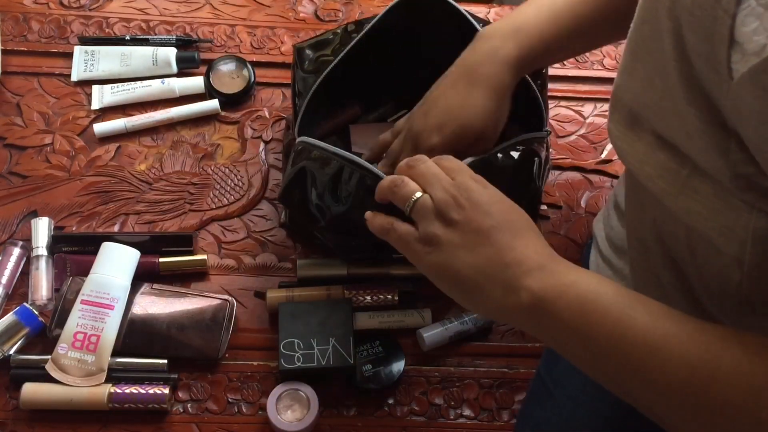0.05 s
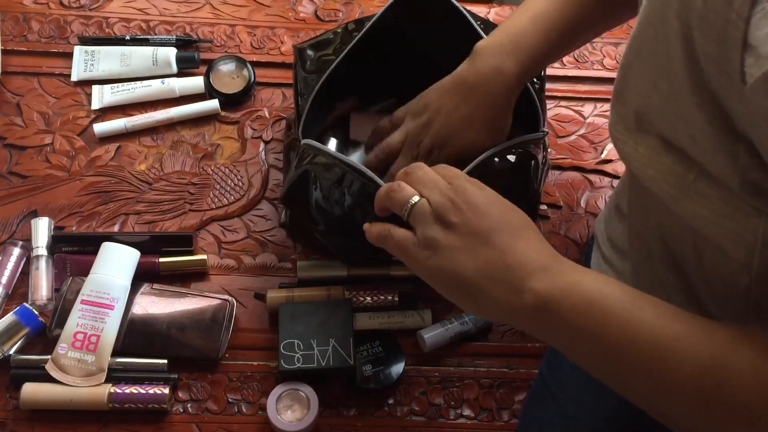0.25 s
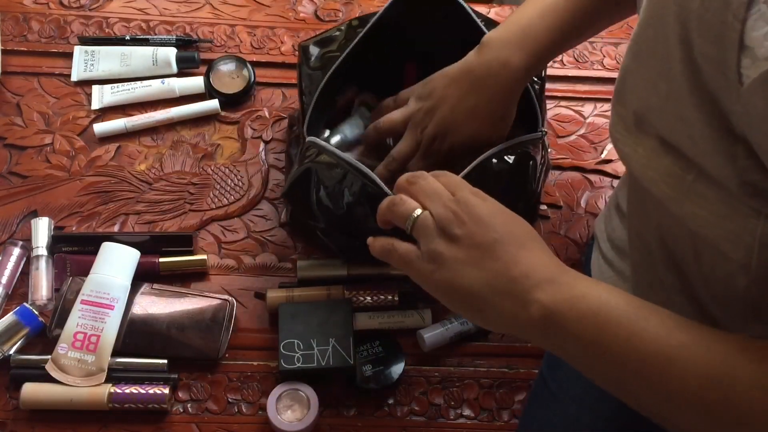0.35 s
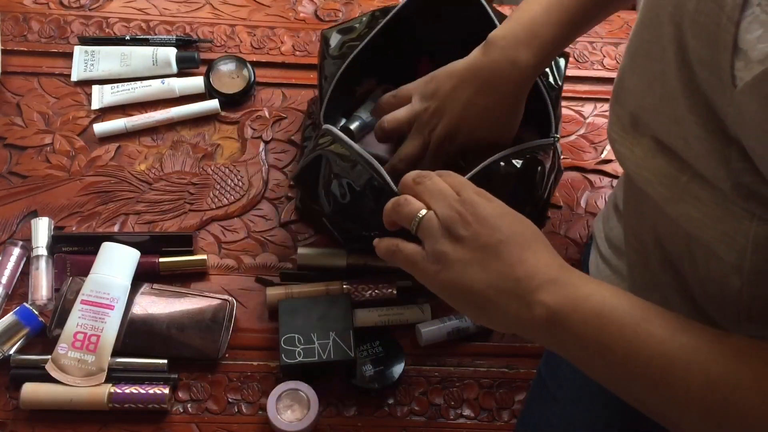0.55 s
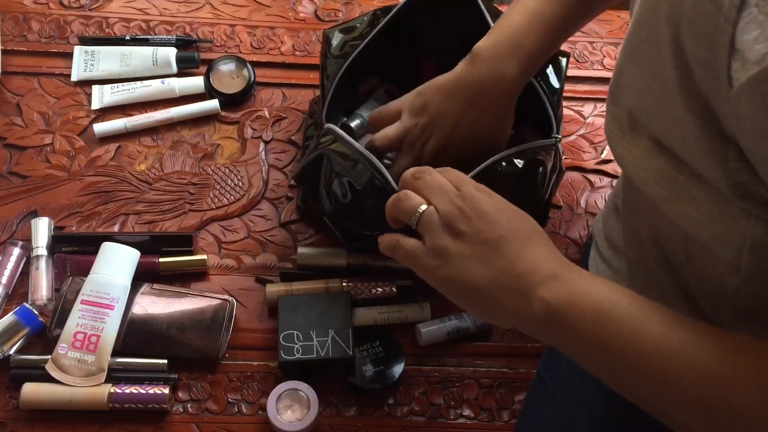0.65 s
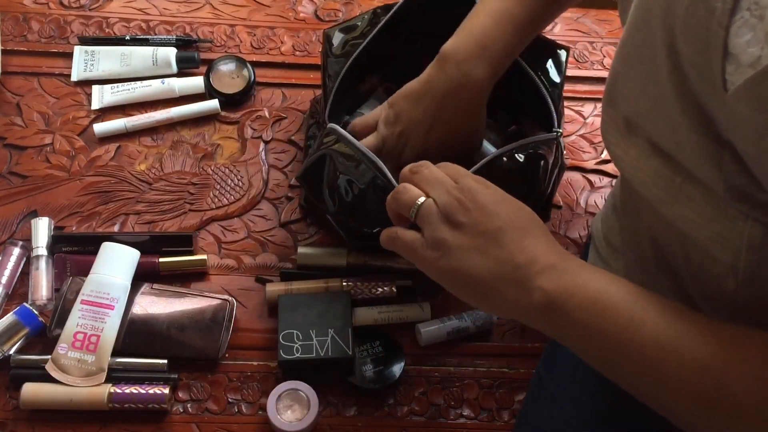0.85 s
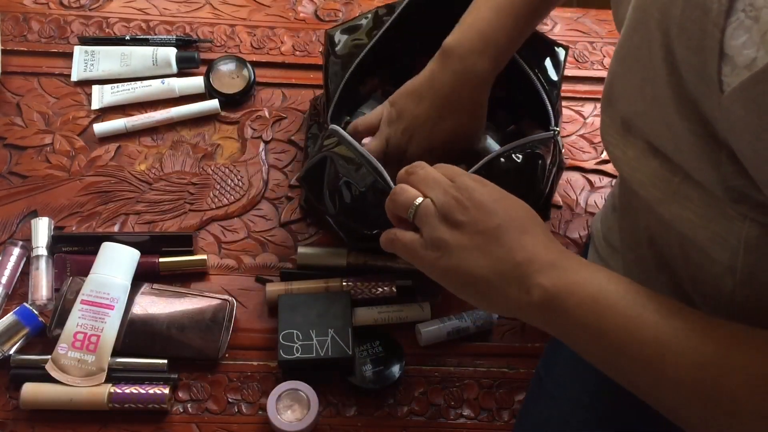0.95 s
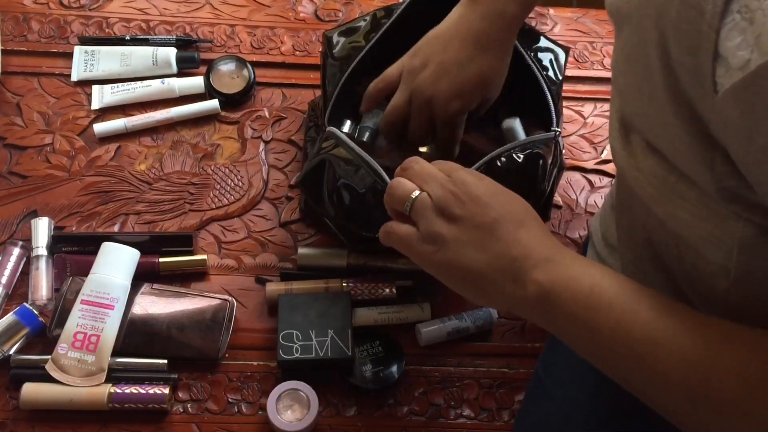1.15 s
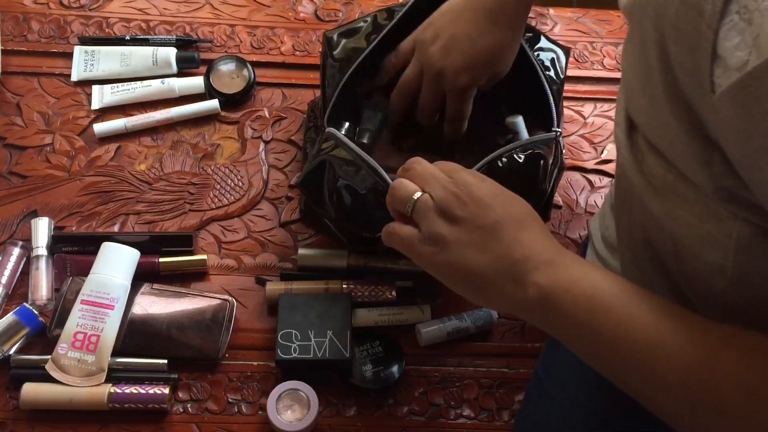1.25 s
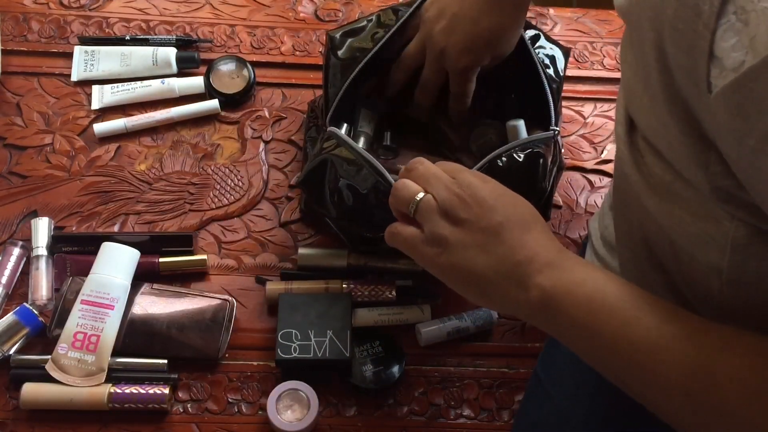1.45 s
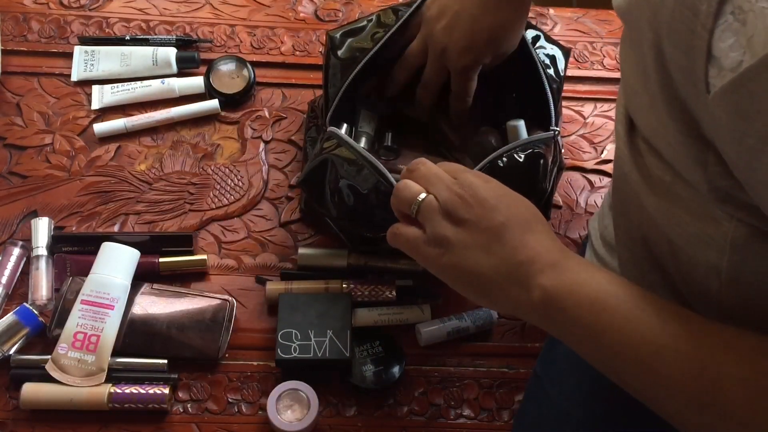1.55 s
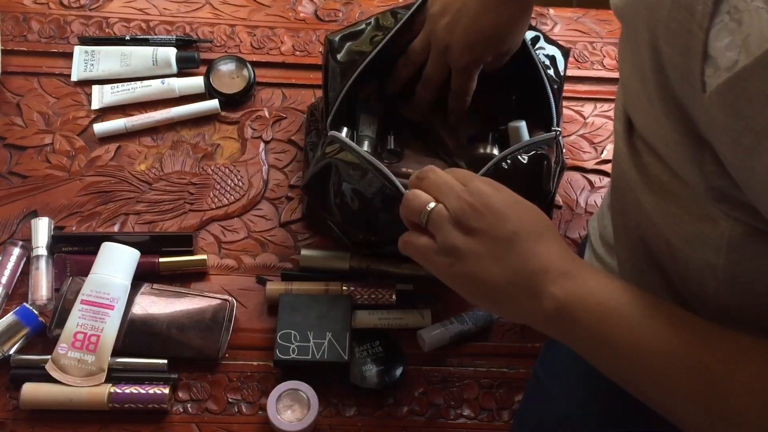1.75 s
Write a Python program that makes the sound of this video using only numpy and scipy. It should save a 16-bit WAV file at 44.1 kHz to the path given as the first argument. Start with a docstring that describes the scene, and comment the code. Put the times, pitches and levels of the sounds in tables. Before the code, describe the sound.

Plastic makeup tubes, pencils and compacts clatter and click as a hand rummages through a vinyl bag

```python
"""A quiet room, a wooden table: a hand rummages in a vinyl bag, heard from above by a camera microphone.
Plastic tubes, pencils and compacts click and knock as damped modes; flat cases slap as short falling tones.
Random grains make the small contacts that rattle between them, and noise makes the rustle of the bag's skin.
The table top booms on three low modes; noise tails answer as bag and room over a steady hush."""
import sys
import numpy as np
from scipy import signal
from scipy.fft import rfft, irfft, next_fast_len
from scipy.io import wavfile
from scipy.ndimage import uniform_filter1d

SR = 44100
rng = np.random.default_rng(int(sys.argv[2]) if len(sys.argv) > 2 else 0)


def file_out(sig):
    """Save sig as 16-bit WAV at sys.argv[1]."""
    # one column per channel
    cols = np.atleast_2d(sig).T
    # limit, then scale
    lim = np.clip(cols, -1, 1)
    pcm = np.round(lim * 32767).astype(np.int16)
    wavfile.write(sys.argv[1], SR, pcm)


def volts(x):
    """Linear amplitude factor 10**(x/20) for a level x in dB, scalar or array-like."""
    e = np.asarray(x, float) / 20
    return 10 ** e


N = 79380  # samples, 1.8 s
TOP_HZ = 16000  # upper limit of the microphone and of the small contacts


def unit(x):
    """Scale to rms 1."""
    return x / np.sqrt(np.mean(x ** 2) + 1e-20)


def along(points, hz):
    """Interpolate (frequency [Hz], value) points on a log frequency axis."""
    f, value = np.transpose(points)
    return np.interp(np.log(hz + 1), np.log(f + 1), value)


def filtered(x, response):
    """Multiply the spectrum of x by a response of frequency."""
    size = next_fast_len(N + 8192)
    hz = np.fft.rfftfreq(size, 1 / SR)
    return irfft(rfft(x, size) * response(hz), size)[..., :N]


def hiss(spectrum):
    """Coloured noise of rms 1."""
    white = rng.standard_normal(N)
    return unit(filtered(white, lambda hz: volts(along(spectrum, hz))))


def place(times, sounds):
    """Sum the rows of sounds at their times."""
    start = np.round(np.asarray(times) * SR).astype(int)
    at = start[:, None] + np.arange(sounds.shape[1])
    return np.bincount(at.ravel(), sounds.ravel(), N + SR)[:N]


def ringing(hz, db, t60, attack_s, size):
    """Sum decaying sine modes from (blows, modes) arrays into one row of peak 1 per blow."""
    t = np.arange(size) / SR
    decay = volts(db[..., None] - 60 * t / t60[..., None])
    sign = np.resize([1, -1], hz.shape[1])[:, None]  # neighbouring modes start in opposite directions
    ring = (decay * sign * np.sin(2 * np.pi * hz[..., None] * t)).sum(1)
    ring = ring * (1 - np.exp(-t / attack_s))
    return ring / np.abs(ring).max(1, keepdims=True)


def crowd(hz, low_hz, soft_hz, crowd_db, tilt_db, count):
    """Each pitch plus count modes around it, tilted per octave and cut by soft contact above soft_hz."""
    spot = (np.arange(count) + rng.random((len(hz), count))) / count
    f = low_hz * (2 * soft_hz / low_hz) ** spot
    away = np.log2(f / hz[:, None])  # octaves from the pitch
    tilt = np.where(away > 0, tilt_db, 0.5)  # under the pitch: 0.5 dB up per octave down
    soft_loss = 20 * np.log10(1 + (f / soft_hz) ** 4)
    level = crowd_db - tilt * away - soft_loss
    return np.column_stack([hz, f]), np.pad(level, ((0, 0), (1, 0)))


# hush of the room, shape of the spectrum: (frequency [Hz], relative level [dB per Hz])
AIR_SPECTRUM = [(24, -33), (40, 23), (96, 19.5), (170, -2), (620, 1), (2700, -3), (5580, -7.5),
                (16000, -16.5)]


def air():
    """Steady coloured noise, the hush of the room at the microphone."""
    return volts(-51.5) * hiss(AIR_SPECTRUM)


def grains(per_s, hz, octaves, cycles, spread_db, size):
    """Many small random contacts, each a damped sine; the sum has rms 1."""
    count = 2000  # more than fit in the scene
    u, t = rng.random((count, 3)), np.arange(size) / SR
    s = np.cumsum(-np.log(u[:, 0])) / per_s
    f = np.clip(hz * 2 ** (octaves * rng.standard_normal(count)), 260, TOP_HZ)[:, None]
    level = volts(np.clip(-spread_db * np.log(u[:, 1:2]), -9, 7))
    sign = np.sign(u[:, 2:] - .5)
    rows = level * sign * np.exp(-t * f / cycles * 2) * np.sin(2 * np.pi * f * t)
    heard = s < N / SR
    return unit(place(s[heard], rows[heard]))


# slope of the bright noise in rustle and click cracks: (frequency [Hz], relative level [dB per Hz])
TREBLE_SPECTRUM = [(1760, -11.5), (3000, -25.5), (3940, -7), (4860, -10.5), (9600, -17.5), (14700, -20),
                   (16000, -33.5)]
# how hard the hand stirs, each level before its trim:
# (time [s], rattle level [dB], level of ticks and vinyl rustle [dB])
HAND_STIR = [(.17, -57, -89), (.21, -28.5, -72), (.32, -34, -61.5), (.44, -18.5, -44), (.54, -31.5, -54.5),
             (.7, -42.5, -79), (.8, -40, -53.5), (0.937, -51, -78.5), (1.048, -21, -56), (1.16, -30.5, -59),
             (1.331, -26, -46), (1.559, -39.5, -59.5), (1.64, -77, -88), (1.77, -40, -70)]
RATTLE_DB, TICK_DB, RUSTLE_DB = -5, 12.5, 5  # trims
CRINKLE_DB = 3.5  # rms wander of the rustle level


def stirring():
    """Small contacts, bright ticks and the noise of the vinyl skin follow the strength of the hand."""
    s, low_db, high_db = np.transpose(HAND_STIR)
    t = np.arange(N) / SR
    low, high = volts(np.interp(t, s, low_db)), volts(np.interp(t, s, high_db))
    rattle = grains(per_s=570, hz=598, octaves=1.227, cycles=4.8, spread_db=4.5, size=900)
    ticks = grains(per_s=390, hz=4850, octaves=0.875, cycles=27, spread_db=-2.5, size=400)
    wander = unit(uniform_filter1d(rng.standard_normal(N), size=160))
    rustle = volts(RUSTLE_DB + CRINKLE_DB * wander) * hiss(TREBLE_SPECTRUM)
    return volts(RATTLE_DB) * low * rattle + high * (volts(TICK_DB) * ticks + rustle)


# duller knocks of hollow cases, times before the shared delay:
# (time [s], peak level [dB], pitch [Hz], loss above the pitch [dB per octave])
CASE_KNOCKS = [(0.004, -33, 579, 3), (0.1831, -17.5, 341, -0.5), (0.22, -28.5, 220, 16),
               (0.279, -25, 1880, -6), (0.399, -16, 655, -4.5), (0.408, -11.5, 1976, 21),
               (0.423, -10.5, 313, -5), (0.448, -7.5, 586, -4), (0.494, -17, 680, 6),
               (0.534, -18.5, 682, 0.5), (0.562, -13.5, 674, -2), (0.619, -37, 340, 14),
               (0.631, -28.5, 1385, -4), (0.66, -27, 1990, 32), (0.7856, -29, 494, 6),
               (0.792, -27.5, 325, 0), (0.992, -20.5, 1710, 8), (1.036, -10, 420, 8.5),
               (1.101, -17, 672, -4), (1.182, -23, 374, 4), (1.235, -21, 278, 1), (1.268, -14.5, 737, -3),
               (1.29, -15.5, 694, -2.5), (1.314, -15.5, 289, 1.5), (1.344, -13, 448, 2),
               (1.355, -16, 373, -0.5), (1.385, -18, 930, 0.5), (1.406, -19.5, 686, 3),
               (1.466, -22, 710, -5.5), (1.52, -17.5, 665, -0.5), (1.556, -27, 646, -2),
               (1.579, -26.5, 418, 0), (1.726, -35, 282, 11), (1.772, -34, 1530, -8)]
KNOCK_DELAY_S = 0.00204
KNOCK_T60_S, KNOCK_SHORTER = 0.06, 0.43  # decay at 500 Hz; exponent by which higher modes die faster


def knocks():
    """Lower modes of hollow cases, damped by hand and bag."""
    s, db, hz, dull_db = np.transpose(CASE_KNOCKS)
    f, level = crowd(hz, low_hz=257.2, soft_hz=3288, crowd_db=-9.5, tilt_db=dull_db[:, None], count=26)
    t60 = KNOCK_T60_S * (500 / f) ** KNOCK_SHORTER
    ring = ringing(f, level, t60, attack_s=0.00027, size=4000)
    return place(s + KNOCK_DELAY_S, volts(db)[:, None] * ring)


# decay of the room: (frequency [Hz], t60 [s])
ROOM_DECAY = [(300, 0.31), (10000, 0.14)]
ROOM_DB, BAG_DB, BAG_T60_S, REBOUNDS_PER_S = -10.5, -14, 0.076, 990


def echoes(x):
    """Separate rebounds inside the bag and off the table, plus the room; new ones for every stretch of sound."""
    out, hop = np.zeros(N + SR), 512
    for i in range(0, N, hop):
        hz, t, z = signal.stft(rng.standard_normal(SR // 4), SR, nperseg=128)
        decay = volts(-60 * t / along(ROOM_DECAY, hz)[:, None])
        room = signal.istft(z * decay, SR, nperseg=128)[1]
        lag = np.arange(len(room)) / SR
        hit = rng.random(len(room)) < REBOUNDS_PER_S / SR
        bag = rng.standard_normal(len(room)) * hit * volts(-60 * lag / BAG_T60_S)
        tail = volts(ROOM_DB) * room / np.linalg.norm(room) + volts(BAG_DB) * bag
        wet = signal.fftconvolve(x[i:i + hop], tail)
        out[i + 90:][:len(wet)] += wet  # starts 2 ms late
    return out[:N]


# flat cases slapped, hardly ringing: (time [s], peak level [dB], final pitch [Hz])
CASE_SLAPS = [(0.1833, -17, 720), (0.3529, -12.5, 540), (0.4403, -8.5, 442), (0.4913, -15, 644),
              (0.5632, -4.5, 1224), (1.029, -10.5, 547), (1.3415, -12.5, 650), (1.709, -36, 415),
              (1.7242, -27.5, 370), (1.767, -31, 357)]
RISE_CYCLES = 0.75  # from start to peak
GLIDE, GLIDE_CYCLES = 2.4, 0.4  # extra pitch at the start (share of the final pitch), its fall in cycles


def slaps():
    """A bending wave of two or three cycles whose high part arrives first."""
    s, db, hz = np.transpose(CASE_SLAPS)
    cycles = hz[:, None] * np.arange(1500) / SR
    turns = cycles + GLIDE * GLIDE_CYCLES * (1 - np.exp(-cycles / GLIDE_CYCLES))
    rise = cycles / RISE_CYCLES
    swell = (rise * np.exp(1 - rise)) ** 2
    return place(s, volts(db)[:, None] * swell * np.sin(2 * np.pi * turns))


# the table top booms under the load: (time [s], peak level [dB])
TABLE_BOOMS = [(0.229, -27), (0.35, -31.5), (0.427, -19.5), (0.78, -31), (1.028, -15), (1.171, -28),
               (1.296, -27), (1.346, -30), (1.406, -31.5), (1.47, -31.5), (1.711, -35.5), (1.76, -44)]
# modes of the table top: (frequency [Hz], relative level [dB], t60 [s])
TABLE_MODES = [(67.3, 4, 0.11), (76.5, 0.5, 0.23), (106.1, 3.5, 0.16)]


def booms():
    """The low modes of the table top, softly pushed."""
    s, db = np.transpose(TABLE_BOOMS)
    hz, level, t60 = np.transpose(TABLE_MODES)[:, None] + np.zeros((len(s), 1))
    ring = ringing(hz, level, t60, attack_s=0.0035, size=12000)
    return place(s, volts(db)[:, None] * ring)


# hard plastic clicks, crack before its trim:
# (time [s], peak level of the ring [dB], pitch [Hz], crack relative to the ring [dB])
PLASTIC_CLICKS = [(0.248, -27, 3800, -30), (0.2721, -21.5, 4100, -13), (0.2842, -13, 4170, -10.5),
                  (0.3317, -21, 3860, -35.5), (0.362, -23, 3760, -18), (0.3818, -19.5, 3370, -33),
                  (0.4097, -8.5, 3420, -7.5), (0.4297, -3.5, 3720, -18), (0.447, -24, 3850, -6),
                  (0.4625, -11, 5970, -3), (0.501, -30, 4240, -12), (0.523, -12, 4125, -15),
                  (0.7713, -24, 1830, -15), (0.7839, -15, 2474, -14), (0.7839, -12.5, 3750, -2.5),
                  (0.993, -26.5, 4470, -20), (1.026, -13, 2820, -4), (1.0385, -14.5, 2887, 0.5),
                  (1.057, -8.5, 4040, -10), (1.0636, -12, 3980, -3.5), (1.0791, -17.5, 7600, 0),
                  (1.0871, -17, 4130, -29), (1.106, -21, 3224, -16), (1.112, -16.5, 2060, -20),
                  (1.1349, -20.5, 3140, 2.5), (1.1927, -25.5, 2730, -11), (1.1983, -28.5, 3720, -1),
                  (1.218, -17.5, 4450, -6.5), (1.242, -9, 4200, -4.5), (1.2486, -14.5, 4100, -17),
                  (1.2889, -17, 2670, -8.5), (1.2958, -9.5, 4290, -9), (1.3138, -15.5, 2680, -3),
                  (1.3185, -18.5, 4000, -12), (1.345, -15.5, 5820, -3), (1.359, -19.5, 6300, -6),
                  (1.3655, -13.5, 6120, -13), (1.385, -18.5, 3420, 0), (1.4075, 0.5, 4520, -8.5),
                  (1.4078, -4.5, 6250, -32.5), (1.496, -19, 2610, -17), (1.5033, -17.5, 4090, -23),
                  (1.7596, -33.5, 2470, -37)]
CLICK_T60_S, CRACK_T60_S, CRACK_DB = 0.014, 0.01603, 1.5  # the last trims every crack


def clicks():
    """Short bright modes of hard plastic plus a crack of treble noise."""
    s, db, hz, crack_db = np.transpose(PLASTIC_CLICKS)
    f, level = crowd(hz, low_hz=1629.0, soft_hz=7463, crowd_db=-9, tilt_db=1, count=26)
    ring = ringing(f, level, np.full(f.shape, CLICK_T60_S), attack_s=0.000073, size=1200)
    t = np.arange(2000) / SR
    decay = volts((db + crack_db + CRACK_DB)[:, None] - 60 * t / CRACK_T60_S)
    crack = decay * (1 - np.exp(-t / 0.00066))
    return place(s, volts(db)[:, None] * ring) + place(s, crack) * hiss(TREBLE_SPECTRUM)


def scene():
    """Contents of the bag with their echoes, then stirring, table and room hush."""
    bag = knocks() + slaps() + clicks()
    return (air() + stirring() + bag + echoes(bag) + booms())[None]


# dips of the microphone: (centre [Hz], width [Hz], depth [share, 0-1])
MIC_DIPS = [(4710, 734, 0.31), (10260, 730, 0.59)]


def microphone(hz):
    """Response: resonant dips, a second-order low cut and a sharp upper limit."""
    low_cut_hz = 63
    response = (hz < TOP_HZ) * hz ** 2 / (hz ** 2 - low_cut_hz ** 2 - 1.3j * hz * low_cut_hz)
    for centre, width, depth in MIC_DIPS:
        band = 1j * hz * width
        response = response * (1 - depth * band / (centre ** 2 - hz ** 2 + band))
    return response


def top_cut(x):
    """Nothing passes above the cut-off."""
    return signal.sosfilt(signal.butter(12, 16330, fs=SR, output="sos"), x)


def record(dry):
    """The scene through the microphone, clipped at full scale."""
    mix = np.clip(filtered(dry, microphone), -1, 1)
    return top_cut(mix)


dry = scene()
out = record(dry)
file_out(out)
```